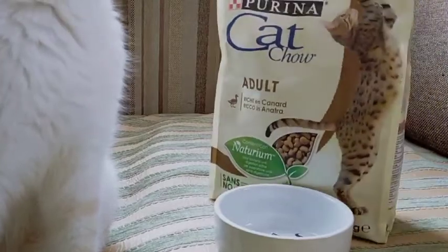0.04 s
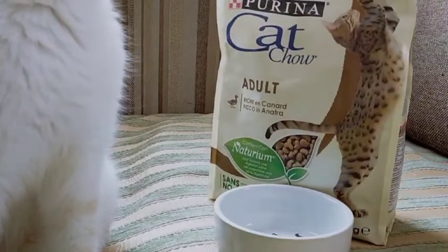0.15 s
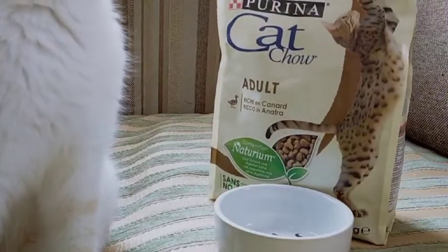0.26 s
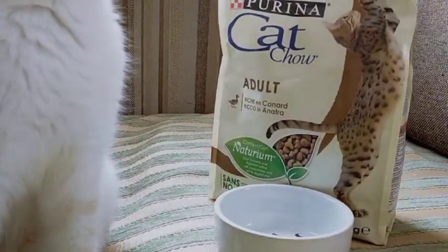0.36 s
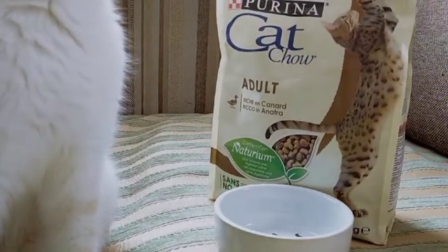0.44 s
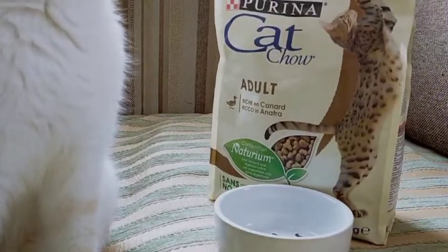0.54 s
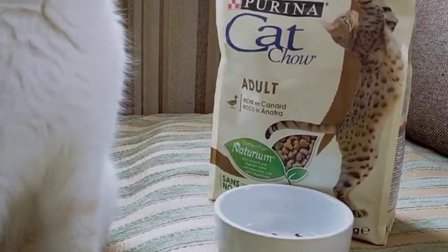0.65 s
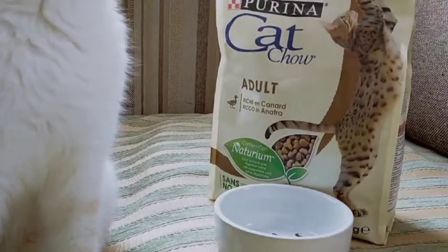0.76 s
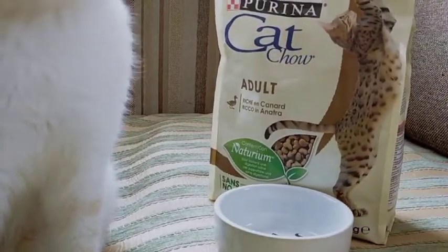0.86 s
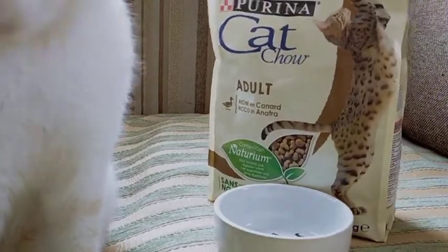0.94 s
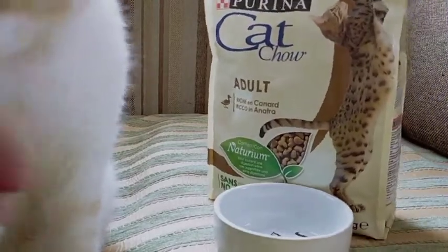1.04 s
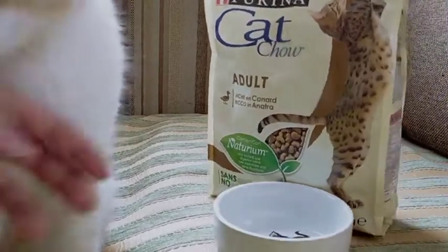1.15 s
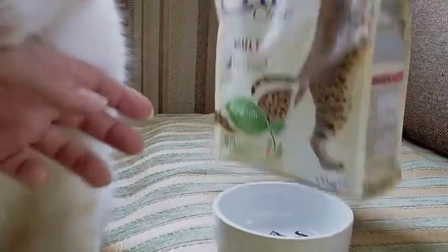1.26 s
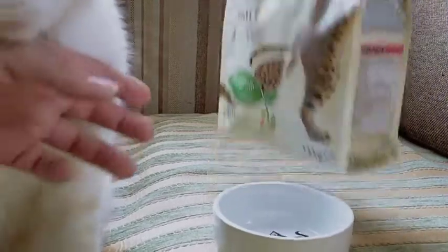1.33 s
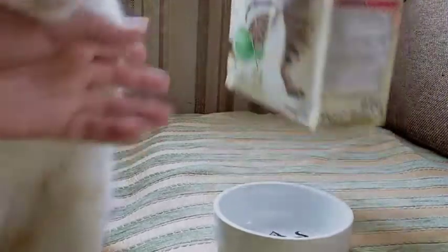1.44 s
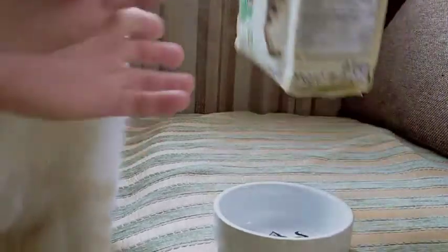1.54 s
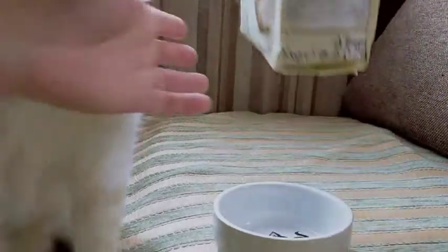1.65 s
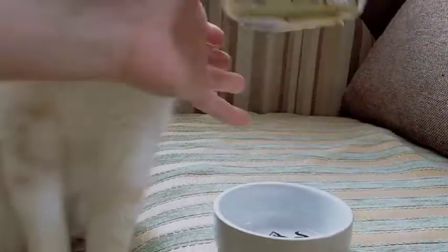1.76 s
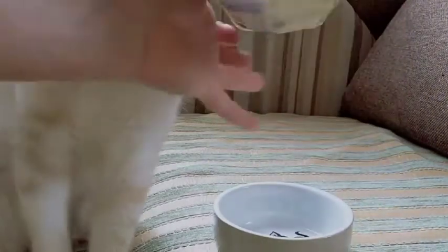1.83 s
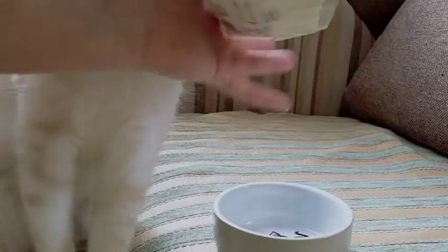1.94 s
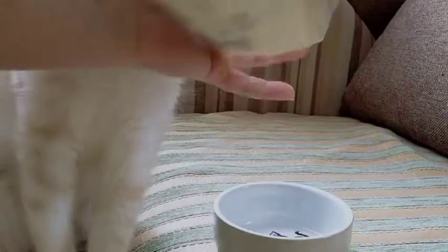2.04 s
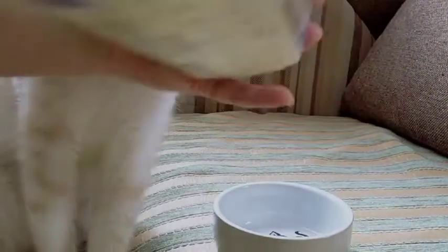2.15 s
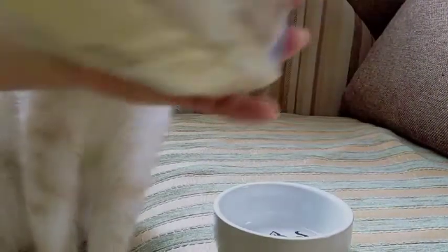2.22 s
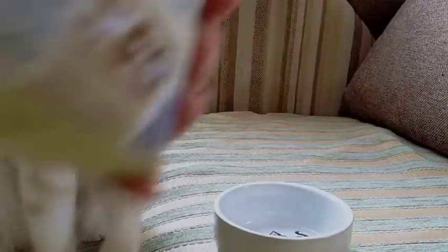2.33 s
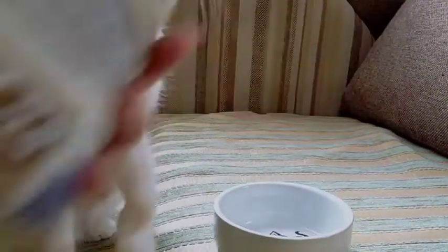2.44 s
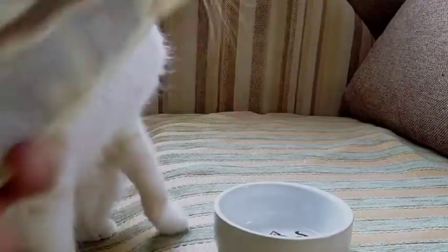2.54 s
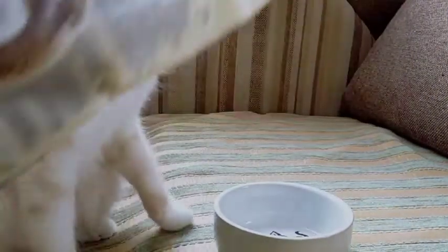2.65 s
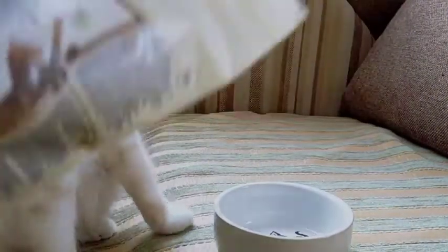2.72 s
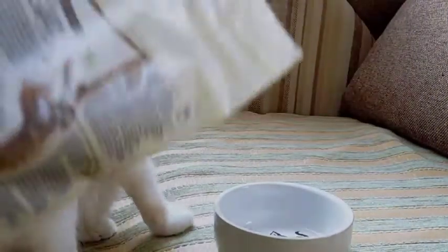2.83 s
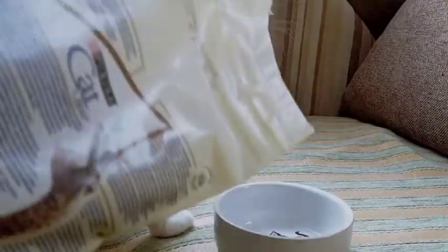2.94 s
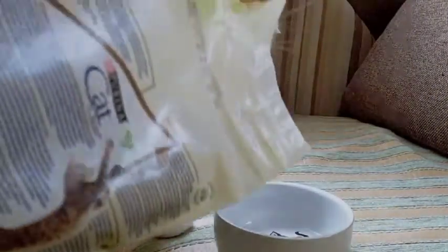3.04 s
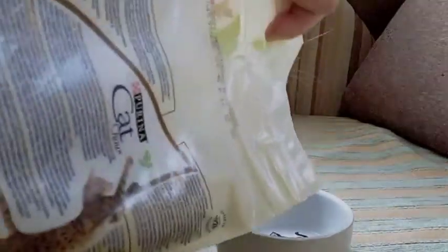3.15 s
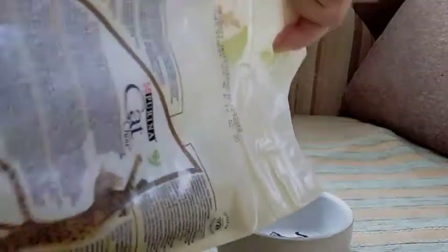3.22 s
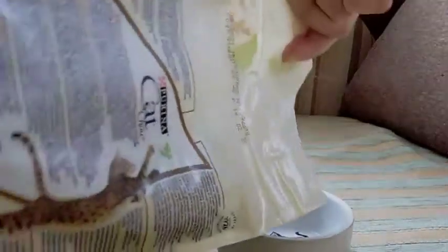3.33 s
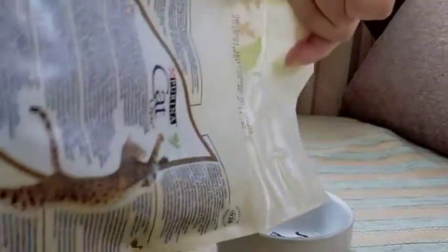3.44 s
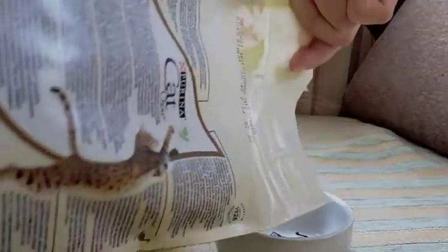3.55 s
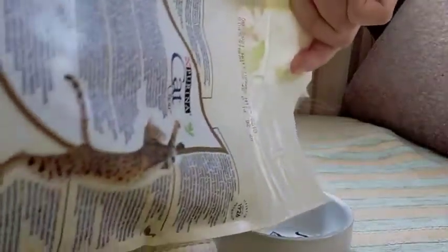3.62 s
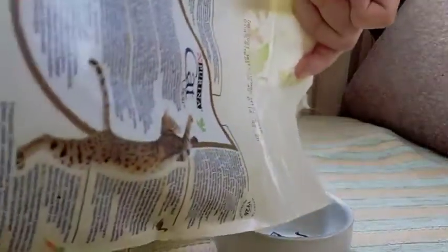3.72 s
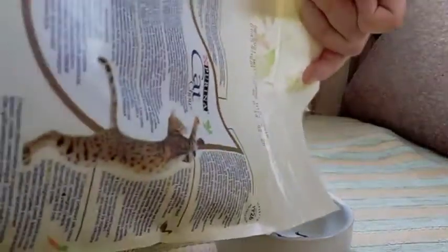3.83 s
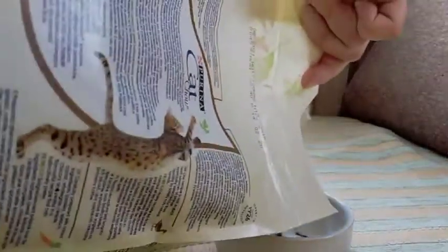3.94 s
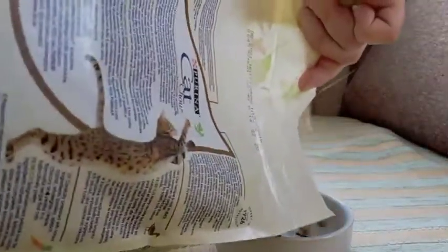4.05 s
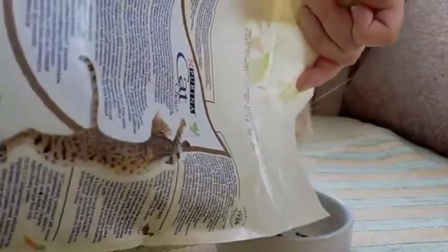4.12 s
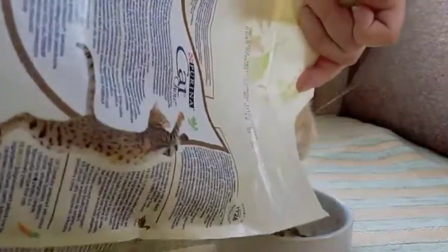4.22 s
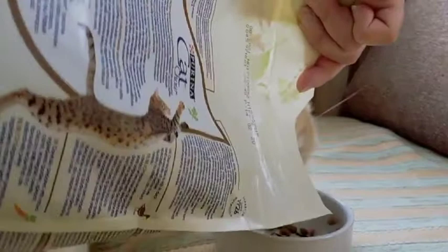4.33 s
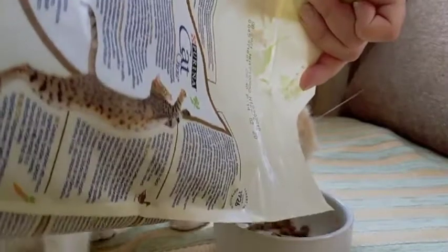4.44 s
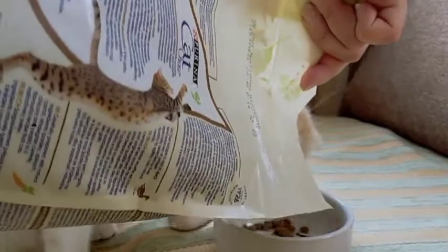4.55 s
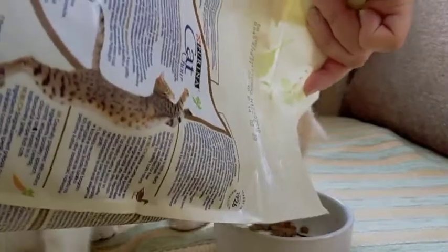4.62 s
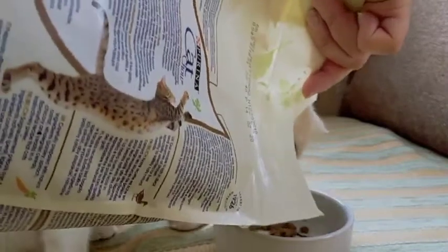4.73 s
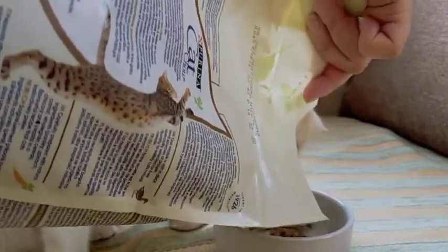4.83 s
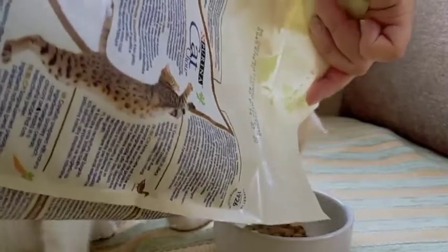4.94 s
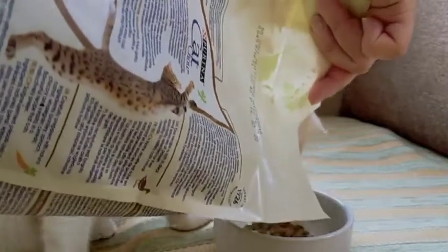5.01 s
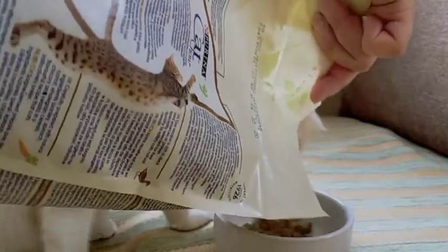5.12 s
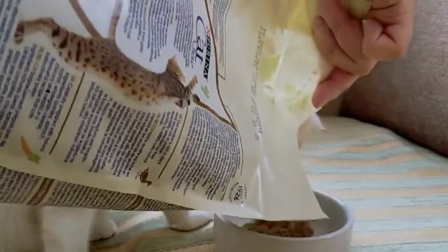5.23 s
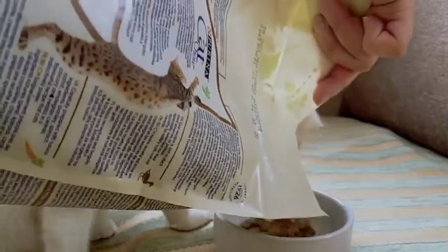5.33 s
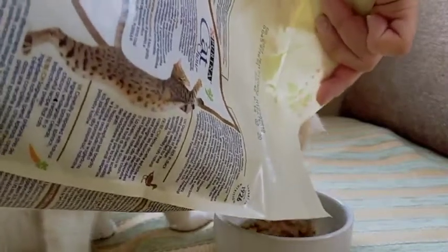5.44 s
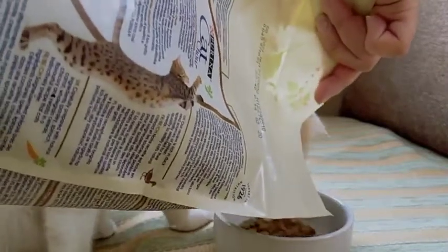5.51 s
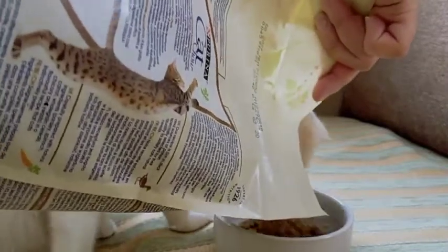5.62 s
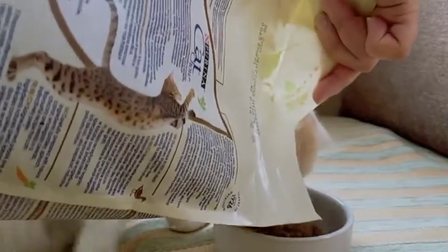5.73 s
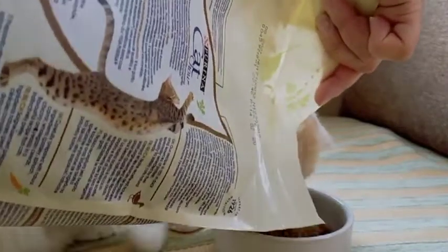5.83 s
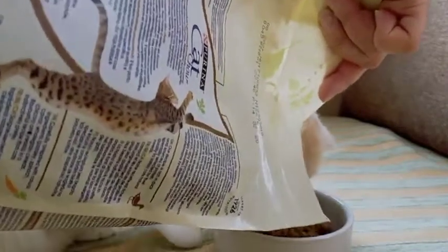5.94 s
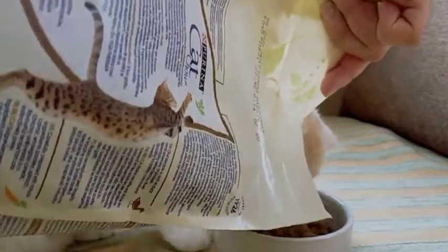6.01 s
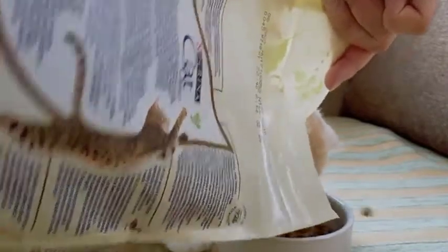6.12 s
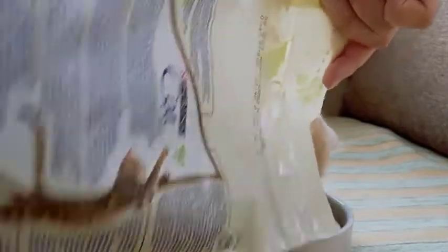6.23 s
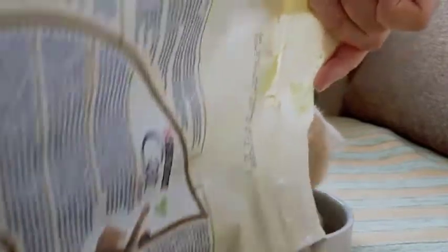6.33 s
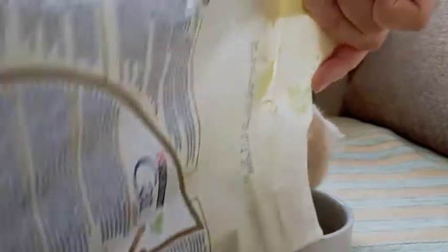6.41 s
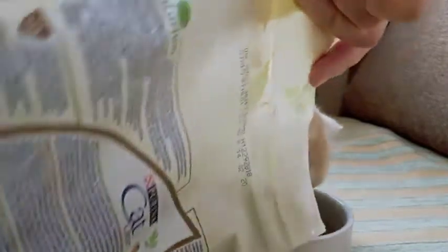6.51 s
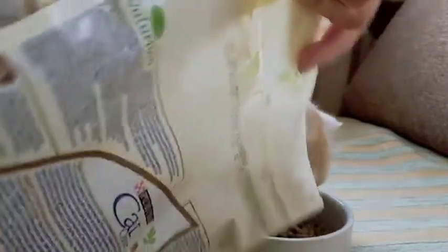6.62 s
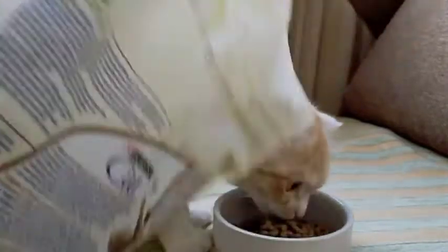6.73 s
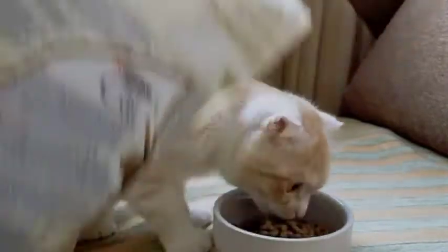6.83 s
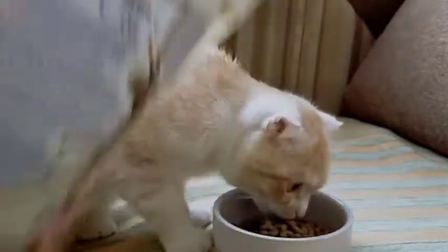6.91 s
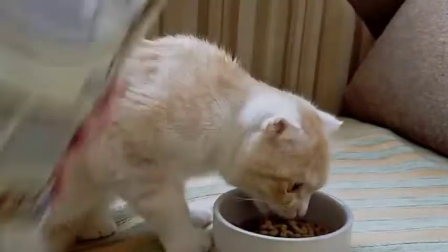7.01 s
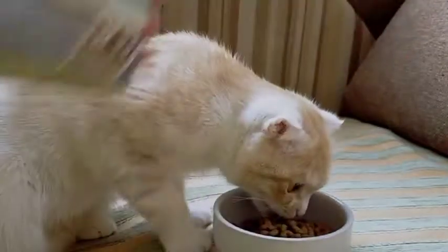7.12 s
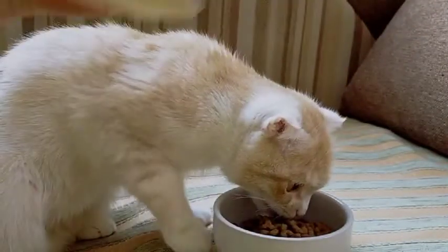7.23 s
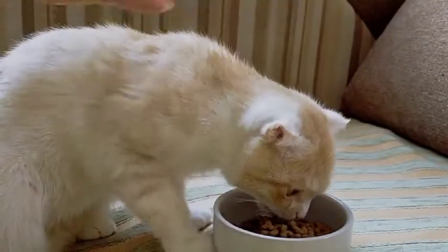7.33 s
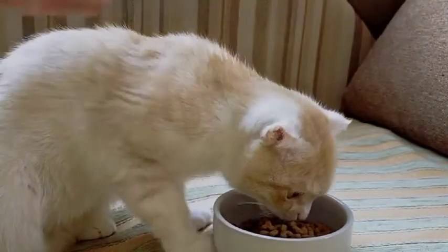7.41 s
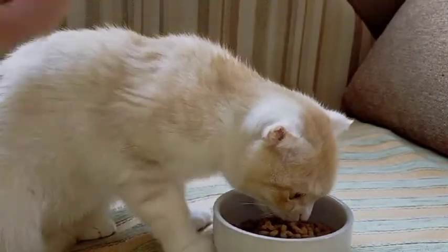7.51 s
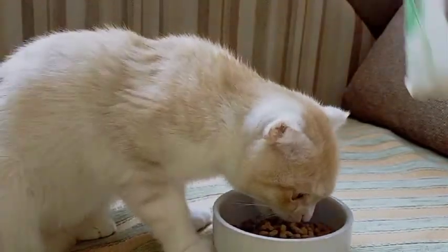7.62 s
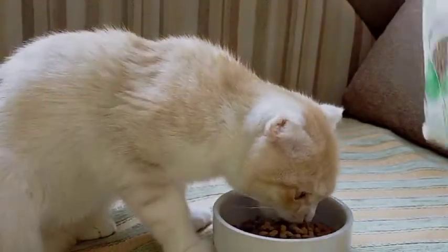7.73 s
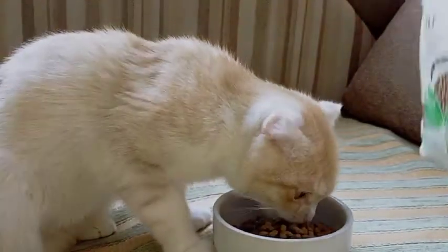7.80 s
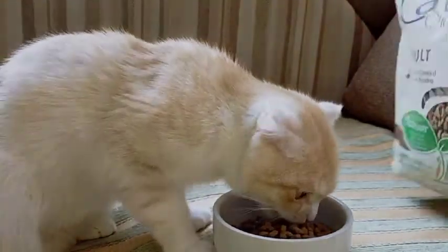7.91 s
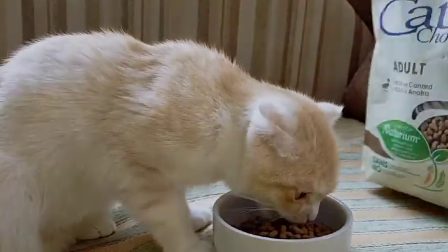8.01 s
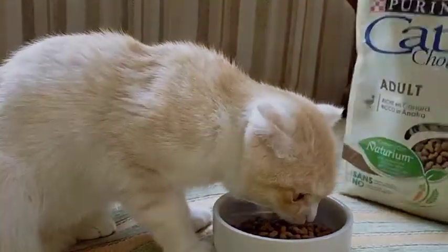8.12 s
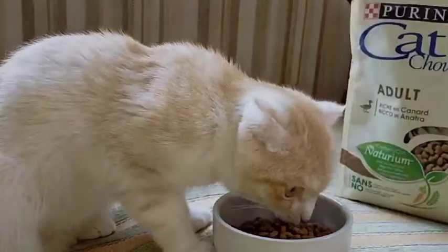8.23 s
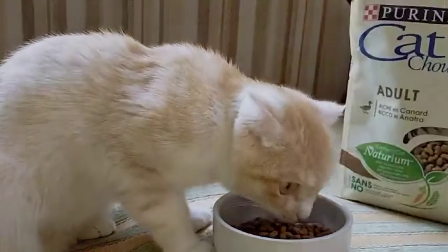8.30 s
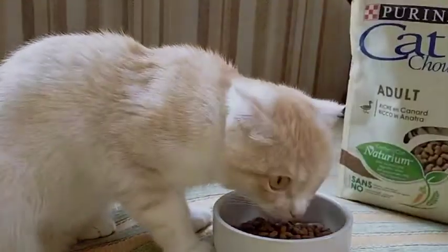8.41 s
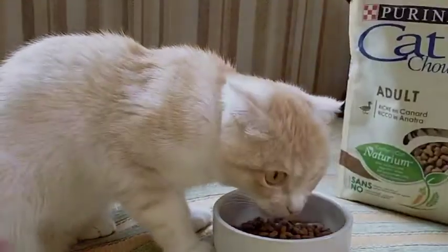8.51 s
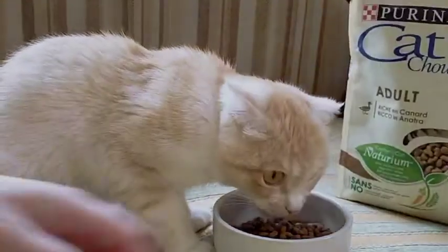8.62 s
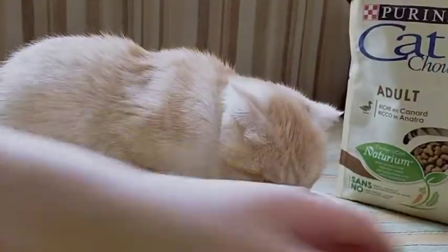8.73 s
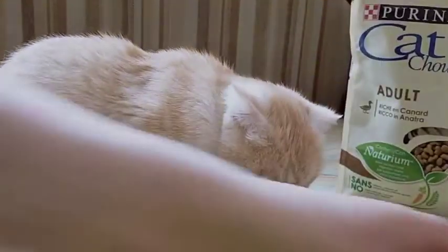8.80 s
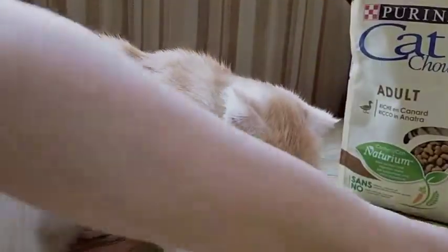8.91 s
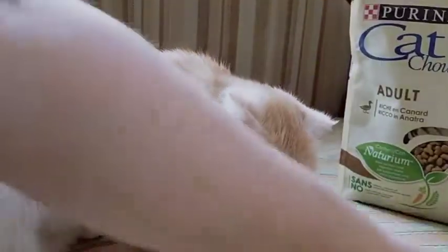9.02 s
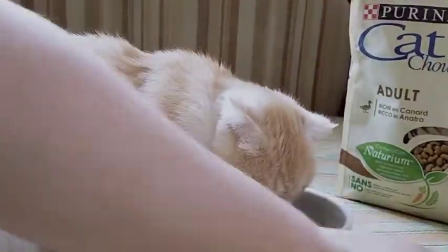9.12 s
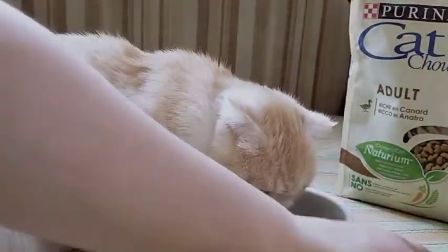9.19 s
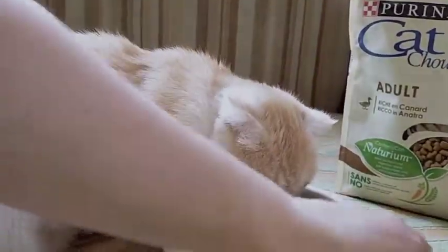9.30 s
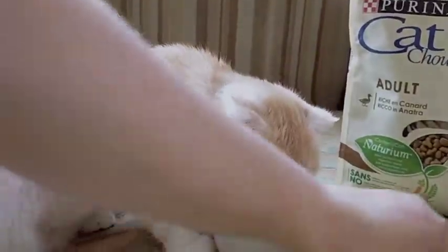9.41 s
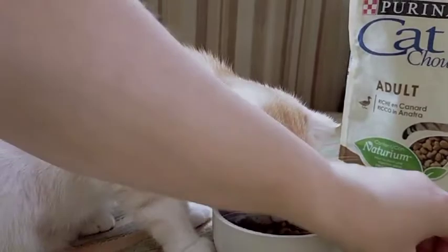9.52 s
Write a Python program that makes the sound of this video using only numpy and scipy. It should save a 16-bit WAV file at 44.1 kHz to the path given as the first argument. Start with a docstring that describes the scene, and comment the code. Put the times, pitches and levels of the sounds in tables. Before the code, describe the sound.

In a quiet, soft-furnished room, close to a small microphone, a stiff plastic bag gives a few soft snaps, then crackles increasingly loudly as it is lifted and tipped. Dry kibble pours thinly into a ceramic bowl with bright clicks and short glassy rings, dulling as the bowl's base is covered. The bag crinkles strongly again, its load slumping with soft thumps, and is set down. Only faint hush remains.

```python
"""Soft snaps and rustles of stiff plastic film come first, over the faint hush of a soft-furnished room.
A food bag is lifted, tipped and set down again on a bed, close to a small microphone: bursts of noise make
the film and the kibble shifting inside, and soft low cycles make the load slump. Then kibble pours into a
ceramic bowl: ticks of treble noise and decaying sines, until the ring of the small ones is muted.
Random reflections give a short tail."""
import sys
import numpy as np
from scipy import signal
from scipy.fft import rfft, irfft, next_fast_len
from scipy.io import wavfile
from scipy.ndimage import uniform_filter1d

SR = 44100
rng = np.random.default_rng(int(sys.argv[2]) if len(sys.argv) > 2 else 0)


def log_audio(samples):
    """Write samples as a 16-bit WAV file to the path given in sys.argv[1]."""
    # one column per channel
    frames = np.atleast_2d(samples).T
    # limit to full scale, then quantise
    limited = np.clip(frames, -1, 1)
    pcm = np.round(limited * 32767).astype(np.int16)
    wavfile.write(sys.argv[1], SR, pcm)


N = 421581  # length in samples

# Ring modes of the bowl's wall. Each row: frequency in Hz, level in dB, t60 in seconds.
WALL_MODES = [(2480, 0, 0.21), (5533, -12, 0.25), (9137, -13, 0.25), (13406, -16, 0.3)]
# Ring modes of the bowl's base in three families (low, middle, high), split by its uneven shape.
# Each row of a family: frequency in Hz, level in dB, t60 in seconds.
BASE_MODES = [
    [(5790, -3, .13), (5828, 0, .15), (5870, -4, .11)],
    [(9195, -5, .12), (9245, 0, .14), (9280, -3, .12), (11476, -10, .13)],
    [(13751, -1, .12), (13908, -1, .12), (13985, 0, .14)],
]
TICK_DB = -7  # tick of a landing kibble, re its ring


def gain_of(db):
    """Decibels to gain."""
    return 10 ** (np.asarray(db) / 20)


def evened(x):
    """Scales to rms 1."""
    return x / np.sqrt(np.mean(x ** 2) + 1e-20)


def read(points, hz):
    """Reads a table on a log-frequency axis."""
    f, value = np.transpose(points)
    return np.interp(np.log(hz + 1), np.log(f + 1), value)


def follow(rows):
    """Each column of a curve table, sample by sample."""
    s, *columns = np.transpose(rows)
    return [np.interp(np.arange(N) / SR, s, c) for c in columns]


def add(mix, s, sound):
    """Mixes a sound in at time s."""
    part = mix[round(s * SR):][:len(sound)]
    part += sound[:len(part)]


def colour(x, points):
    """Shapes x by a spectrum table, rms 1."""
    size = next_fast_len(len(x))
    gain = gain_of(read(points, np.fft.rfftfreq(size, 1 / SR)))
    return evened(irfft(rfft(x, size) * gain, size)[:len(x)])


def band(x, lo_hz, hi_hz, order=1):
    """Band-pass, peak 1."""
    b, a = signal.butter(order, [lo_hz, min(hi_hz, SR / 3)], "bandpass", fs=SR)
    y = signal.lfilter(b, a, x)
    return y / abs(y).max()


def slow_drift(width):
    """Noise smoothed twice over a width in samples, rms 1."""
    return evened(uniform_filter1d(uniform_filter1d(rng.standard_normal(N), width), width))


def grains(per_s, spread_db, length_s, clumps_db, count=12):
    """Random clicks in clumps, a few large, each a short burst of one of a few noise shapes."""
    size = gain_of(spread_db * np.minimum(rng.exponential(1, N), 4) + clumps_db)
    size *= rng.random(N) < per_s / SR
    kind, t = rng.integers(0, count, N), np.arange(900) / SR
    decay_s = length_s * np.geomspace(.4, 2.2, count)[:, None]
    shapes = rng.standard_normal((count, len(t))) * np.exp(-t / decay_s)
    out = sum(signal.oaconvolve(size * (kind == k), shapes[k])[:N] for k in range(count))
    return out / np.sqrt(uniform_filter1d(out ** 2, SR // 3) + 1e-12)  # steady over a third of a second


def rustle():
    """Film crackle, the dull weight of kibble sliding inside, and fine ticks, all led by the hands' jerks."""
    # How the hands work the bag. Each row: time in seconds, rustle in dB, weight of shifting kibble in dB.
    handling = [(0.0, -62, -62.5), (0.48, -100.5, -111), (0.72, -77.5, -71.5), (0.96, -76, -71),
                (1.89, -72, -82.5), (2.37, -68, -74), (2.61, -47, -61), (2.75, -46.5, -73),
                (2.83, -54.5, -71.5), (2.93, -40.5, -55), (3.3, -51, -57.5), (3.6, -41.5, -58.5),
                (3.78, -46.5, -51.5), (4.37, -57, -64.5), (4.82, -52.5, -57.5), (5.51, -47.5, -55),
                (6.04, -57, -65), (6.3, -54, -53), (6.51, -76.5, -65), (6.65, -55, -55), (6.79, -48.5, -56),
                (6.92, -39, -50), (7.24, -46.5, -52.5), (7.45, -48.5, -52), (7.8, -60.5, -59),
                (8.14, -65, -55.5), (8.31, -72, -67), (8.49, -93, -93), (9.0, -89.5, -87),
                (9.1, -81.5, -94), (9.25, -82, -83), (9.45, -83.5, -89)]
    # Colour of the film's rustle. Each row: frequency in Hz, relative level in dB per Hz.
    film_colour = [(150, -14.5), (349, -16), (480, -3), (920, -0.5), (1010, 2), (1410, -6), (2000, -5.5),
                   (2890, -6.5), (4600, -21.5), (6000, -31), (7800, -43.5), (13200, -120)]
    # Colour of the dull shifting. Each row: frequency in Hz, relative level in dB per Hz.
    weight_colour = [(18, -51), (30, -24), (55, -22), (95, -4.5), (290, -2.5), (480, -6.5), (800, -59.5)]
    # Colour of the fine ticks. Each row: frequency in Hz, relative level in dB per Hz.
    crisp_colour = [(2940, -41.5), (5000, -21), (8170, -4), (9600, -13.5), (12900, -15.5), (15200, -7),
                    (16000, -4)]
    level_db, weight_db = follow(handling)
    jerks = slow_drift(900)
    film = colour(grains(800, 2.4, 0.0028, 2 * jerks), film_colour)
    tilt = gain_of(slow_drift(1500))
    sharp = colour(grains(1100, 3.8, .0007, 2 * jerks), film_colour)  # small creases crack short
    split = signal.butter(2, 1800, fs=SR, output="sos")
    low = signal.sosfiltfilt(split, film)
    high = sharp - signal.sosfiltfilt(split, sharp)
    film = low / tilt + high * tilt  # the crackle drifts between dull and bright
    weight = colour(grains(300, 2.8, 0.0092, 2.3 * jerks), weight_colour)
    crisp = colour(grains(3500, 3, 0.00013, 3.0 * jerks), crisp_colour)
    crisp_db = -58 + 0.59 * (level_db + 47)  # -58 dB at a -47 dB rustle; they sink less than it does
    return gain_of(level_db) * film + gain_of(weight_db) * weight + gain_of(crisp_db) * crisp


def hush():
    """The faint hush of the quiet room: steady coloured noise."""
    # Colour of the hush. Each row: frequency in Hz, relative level in dB.
    hush_colour = [(8.8, -29), (16, 11), (30, -12), (65, -14.5), (190, -20.5), (442, -31), (2400, -36.5),
                   (5280, -48.5), (8180, -62), (9740, -50), (16000, -43.5)]
    return gain_of(-64) * colour(rng.standard_normal(N), hush_colour)


def snap_body(hz, push_noise, burst_noise):
    """A buckling panel's click and noise through a broad resonance, with the sheet and a dull push."""
    rise_s, base_s, cycles = .0008, .001, 1.8  # a moment plus a few cycles: low panels sound longer
    click_gain, panel_span = 0.31, 1.3  # first instant re the noise; band edges as a ratio to the pitch
    sheet_db = 4.5  # re the panel
    after_db, after_s = -25.5, 0.039  # the crackle after each snap
    push_db, push_ref_hz, push_s = -11, 800, 0.0036  # re a panel of this pitch; small panels push less
    t = np.arange(len(burst_noise)) / SR
    rising = burst_noise * (1 - np.exp(-t / rise_s))
    click = click_gain * t * hz * np.exp(-(2 * t * hz) ** 2)
    burst = rising * np.exp(-t / (base_s + cycles / hz)) + click
    flutter_db = 8.8 * evened(uniform_filter1d(push_noise, 60))
    crackle = rising * gain_of(after_db + flutter_db) * np.exp(-t / after_s)
    panel = band(burst, hz / panel_span, hz * panel_span, order=2)
    body = panel + gain_of(sheet_db) * band(burst + crackle, 640, 2100)
    push = band(push_noise * t * np.exp(-t / push_s), 75, 300, order=2)
    body = body / abs(body).max() + gain_of(push_db) * push_ref_hz / hz * push
    return signal.sosfilt(signal.butter(4, 4000, fs=SR, output="sos"), body)


def snap_edge(edge_noise, fizz_noise):
    """The bright edge of a snap: mostly one click, trailed by a fizz a little above 7 kHz."""
    t = np.arange(len(edge_noise)) / SR
    edge = band(7 * (t == 0) + edge_noise * np.exp(-t / 0.0018), 4300, 12000, order=2)
    fizz = band(fizz_noise * np.exp(-t / 0.007), 7000, 7600)
    return edge + gain_of(-19) * fizz


def snaps():
    """Single snaps of the film: each panel buckles with a resonant body and a bright edge."""
    # Each row: start in seconds, level in dB, pitch of the buckling panel in Hz, bright edge in dB re the body.
    snap_rows = [(0.016, -40.5, 980, -36), (0.306, -52.5, 2200, 0), (0.734, -49, 710, -30),
                 (0.826, -46, 2000, -15), (0.864, -47.5, 900, -8), (0.904, -41.5, 2040, -34),
                 (0.944, -42, 1800, -42), (0.976, -40, 810, -37), (0.995, -37.5, 1090, -30),
                 (1.039, -43, 790, -38), (1.104, -42.5, 525, -40), (1.192, -58.5, 960, 9.5),
                 (1.263, -52.5, 640, -25), (1.309, -48.5, 1000, -29), (1.342, -49.5, 826, -52),
                 (1.376, -47.5, 970, -9), (1.46, -49.5, 870, -34), (1.475, -37.5, 865, -46),
                 (1.568, -30.5, 2200, -5.5), (1.581, -39, 990, -9), (1.798, -39.5, 800, -6),
                 (2.038, -45, 1277, -11), (2.062, -36, 913, -23), (2.084, -24, 2660, 12),
                 (2.177, -45.5, 665, -25), (2.291, -29, 900, -5.5), (2.37, -41.5, 1130, -14),
                 (2.383, -35, 800, -22), (2.473, -30, 780, -17), (2.51, -35, 1120, -31),
                 (2.52, -23, 1210, -8.5), (2.592, -27, 1230, -10.5), (2.649, -25.5, 1060, -14),
                 (2.695, -23.5, 2770, -17), (2.729, -31, 1050, -23), (2.744, -29.5, 1160, -30),
                 (2.856, -34, 920, -24), (2.911, -32, 1070, -24), (2.924, -28, 1180, -33),
                 (3.078, -28.5, 874, -48), (3.119, -26.5, 1010, -30), (3.19, -25.5, 2020, -30),
                 (3.209, -26.5, 1710, -44), (3.25, -28.5, 2400, -12), (3.319, -31.5, 1000, -31),
                 (3.403, -32, 2270, -39), (3.451, -31.5, 880, -30), (3.561, -30.5, 990, -34),
                 (3.594, -28, 2540, -27), (4.374, -43.5, 830, -40), (4.58, -29.5, 710, -29),
                 (5.006, -22, 3100, -7), (6.042, -24, 1930, -21), (6.226, -18, 1900, -19.5),
                 (6.273, -26, 794, -16.5), (6.382, -28.5, 2060, -33), (6.43, -25.5, 2500, -13),
                 (6.553, -35, 1050, -7), (6.579, -37.5, 600, -24), (6.611, -44, 800, -26),
                 (6.656, -37, 1500, -7), (6.672, -32.5, 1280, -25), (6.74, -34, 1170, -26),
                 (6.807, -24.5, 1500, -10.5), (6.878, -22, 1270, -22), (6.917, -29.5, 890, -10),
                 (7.002, -34, 1130, -23), (7.02, -45, 1900, -33), (7.033, -25, 1020, -23),
                 (7.109, -24.5, 930, -11.5), (7.273, -33, 627, -15), (7.356, -28, 1230, -18),
                 (7.511, -27, 1500, -35), (7.704, -32.5, 1350, -26), (7.732, -35, 730, -42),
                 (7.89, -26, 890, -25), (7.916, -31.5, 1730, -19), (7.984, -34, 1370, -30),
                 (8.011, -29, 1040, -22), (8.037, -33.5, 1650, -43), (8.129, -36, 1630, -38),
                 (8.143, -33.5, 1570, -19), (8.194, -32.5, 1600, -44), (8.247, -35, 970, -36),
                 (8.31, -47, 1550, -26), (8.525, -55, 867, -26), (8.695, -55.5, 785, -33)]
    out = np.zeros(N)
    noise = rng.standard_normal((len(snap_rows), 4, 2600))
    for (s, db, hz, edge_db), (burst, edge, push, fizz) in zip(snap_rows, noise):
        sound = snap_body(hz, push, burst) + gain_of(edge_db) * snap_edge(edge, fizz)
        add(out, s, gain_of(db) * sound)
    return out


def thumps():
    """The load of kibble slumps: one or two soft cycles that swell and die."""
    # Each row: start in seconds, level in dB, pitch in Hz.
    slumps = [(0.685, -53, 157), (1.096, -55, 121), (1.376, -49, 144), (1.455, -50, 167), (2.505, -53, 270),
              (3.073, -41, 257), (6.223, -28, 212), (6.268, -37.5, 122), (6.846, -40, 298),
              (6.927, -35, 286), (7.436, -36, 317), (7.807, -51, 155), (8.005, -39, 220), (8.188, -35, 263)]
    out, t = np.zeros(N), np.arange(2600) / SR
    for s, db, hz in slumps:
        envelope = 2 * np.e * t * hz * np.exp(-2 * t * hz)  # peak 1
        add(out, s, gain_of(db) * envelope * np.sin(2 * np.pi * hz * t))
    return out


def ticks(count, lo_hz=4900, hi_hz=11000):
    """The dry click of kibble: short bursts of treble noise."""
    t, decay_s = np.arange(600) / SR, .0006
    envelope = t / decay_s * np.exp(-t / decay_s)
    return [band(x * envelope, lo_hz, hi_hz) for x in rng.standard_normal((count, len(t)))]


def ring(modes, luck):
    """One skittering blow on a set of modes; where it lands sets the share and sign of each."""
    share_db, load_shift = 4.5, .003  # spread of shares; loose kibble pulls modes off pitch, as a ratio
    swell, bounce_s = .85, .007  # a kibble skitters as it lands, so the ring swells over a moment
    t = np.arange(round(.3 * SR)) / SR
    hz, db, t60 = np.transpose(modes)[:, :, None]
    share = gain_of(db + share_db * luck[:len(modes), None]) * np.sign(luck[-len(modes):, None])
    share /= np.linalg.norm(share)
    off = 1 + load_shift * luck[4:4 + len(modes), None]
    tones = share * gain_of(-60 * t / t60) * np.sin(2 * np.pi * hz * off * t)
    return tones.sum(0) * (1 - swell * np.exp(-t / bounce_s))


def stream():
    """A thin stream of small kibbles ticks and rings base and wall, until cover mutes the ring."""
    start_s, end_s, per_s, level_db = 3.79, 6.1, 130, -60
    cover_s, cover_db = (5.67, 5.75), -45  # kibble covers the base and mutes the ring of this stream
    tick_db = 4  # small kibbles click on one another
    out, now = np.zeros(N), np.arange(N) / SR
    hits = rng.random(N) < per_s / SR
    small = hits * gain_of(3.86 * np.minimum(rng.exponential(1, N), 4))
    small *= (now > start_s) * (now < end_s) * gain_of(level_db)
    bare = gain_of(cover_db * np.interp(now, cover_s, (0, 1)))
    spot, luck = rng.integers(0, 12, N), rng.standard_normal((12, 12))
    families = BASE_MODES + [WALL_MODES]
    for k, tick in enumerate(ticks(count=12, lo_hz=1800, hi_hz=6000)):
        here = small * (spot == k)
        out += signal.oaconvolve(here * bare, ring(families[k % len(families)], luck[k]))[:N]
        out += signal.oaconvolve(here, gain_of(tick_db) * tick)[:N]
    return out


def glances():
    """Kibbles glancing off the wall: each gives a tick and rings the wall modes."""
    # Each row: start in seconds, ring in dB.
    glance_rows = [(3.823, -46), (4.084, -52), (4.128, -45.5), (4.405, -48.5), (4.907, -49.5),
                   (5.206, -37.5), (5.491, -48), (5.539, -46), (5.669, -49), (5.829, -49.5), (5.906, -45),
                   (6.0757, -46.5), (6.346, -56)]
    out = np.zeros(N)
    luck = rng.standard_normal((len(glance_rows), 12))
    for (s, db), chance, tick in zip(glance_rows, luck, ticks(len(glance_rows))):
        add(out, s, gain_of(db) * ring(WALL_MODES, chance / 3))  # the wall varies less than the base
        add(out, s, gain_of(db + TICK_DB) * tick)
    return out


def drops():
    """Kibbles landing on the base: each gives a tick and rings the three mode families."""
    # Each row: start in seconds, low, middle and high ring in dB.
    drop_rows = [(3.8232, -42, -52, -40), (3.9234, -41.5, -51, -50), (4.0034, -46, -44, -51),
                 (4.0154, -48, -40, -58), (4.0761, -41, -60, -39), (4.0886, -49, -39.5, -43),
                 (4.1464, -56, -58, -44), (4.1814, -43, -47, -47), (4.2074, -37, -38, -44),
                 (4.2592, -63, -50, -49), (4.2991, -40.5, -46, -36), (4.3146, -42, -59, -50),
                 (4.3869, -43, -41, -42), (4.4019, -48, -48, -52), (4.5254, -44, -52, -55),
                 (4.5484, -46, -41.5, -39), (4.6763, -48, -39, -46), (4.8015, -50, -47, -67),
                 (4.9107, -46, -51.5, -40), (5.0045, -38.5, -38, -37), (5.0614, -43, -45, -40),
                 (5.0823, -41, -41, -49), (5.1208, -41, -57, -38), (5.1901, -36, -38, -45),
                 (5.2184, -42, -39.5, -54), (5.3164, -43.5, -39, -45), (5.3584, -47, -42.5, -46),
                 (5.3996, -59, -40.5, -59), (5.4929, -48, -41, -51), (5.5378, -43.5, -56, -56)]
    out = np.zeros(N)
    luck = rng.standard_normal((len(drop_rows), 3, 12))
    for (s, *levels_db), chances, tick in zip(drop_rows, luck, ticks(len(drop_rows))):
        for db, family, chance in zip(levels_db, BASE_MODES, chances):
            add(out, s, gain_of(db) * ring(family, chance))
        add(out, s, gain_of(max(levels_db) + TICK_DB) * tick)
    return out


def room(x):
    """Sparse reflections of random sign, each band dying at its own speed."""
    # Decay of the room. Each row: frequency in Hz, t60 in seconds.
    decay = [(300, 0.26), (2000, 0.35), (6000, 0.25), (14000, 0.22)]
    taps = np.zeros(SR // 2)
    at = np.arange(400, SR // 2 - 20, 20)  # one reflection in every 20 samples
    taps[at + rng.integers(0, 20, len(at))] = rng.choice([-1., 1.], len(at))
    hz, t, z = signal.stft(taps, SR, nperseg=256)
    fade = gain_of(-60 * t / read(decay, hz)[:, None])
    tail = signal.istft(z * fade, SR, nperseg=256)[1]
    return signal.oaconvolve(x, tail / np.linalg.norm(tail))[:N]


def scene():
    """Bag and bowl in the room, over the hush."""
    near = rustle() + snaps() + thumps() + stream() + glances() + drops()
    # two random tails cross-fade once a second, so no fixed colour stands out
    phase = 2 * np.pi * np.arange(N) / SR
    tail = room(near * np.sin(phase)) + room(near * np.cos(phase))
    return (near + gain_of(-13.0) * tail + hush())[None]


def record(dry):
    """The band limit of the recorder: a low-pass at 15850 Hz."""
    low_pass = signal.firwin(511, 15850, window=("kaiser", 9), fs=SR)
    return signal.oaconvolve(dry, low_pass[None], "same")


dry = scene()
out = record(dry)
log_audio(out)
```